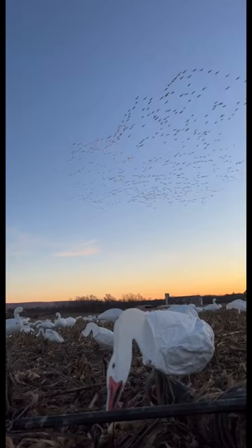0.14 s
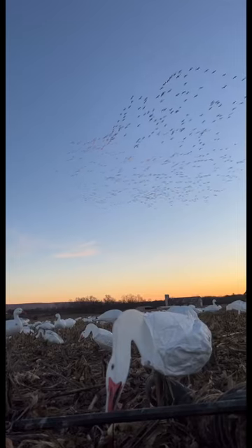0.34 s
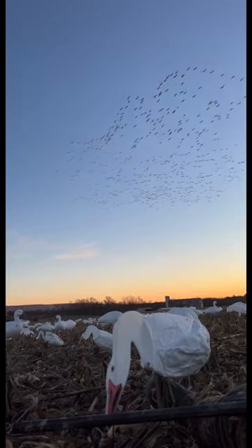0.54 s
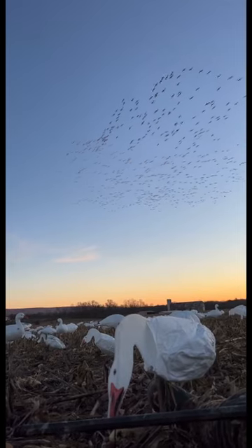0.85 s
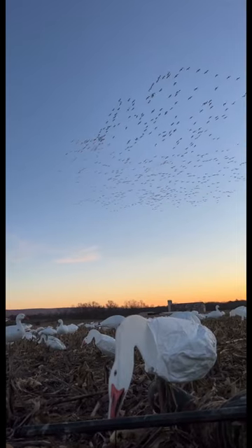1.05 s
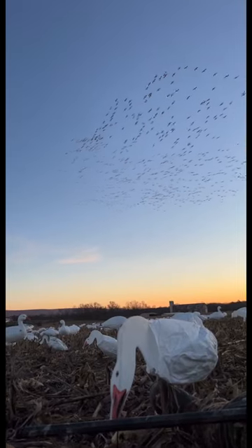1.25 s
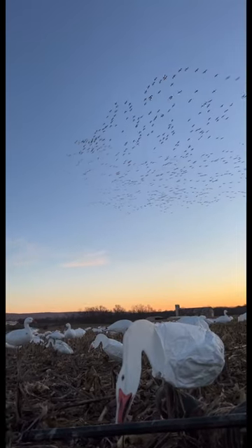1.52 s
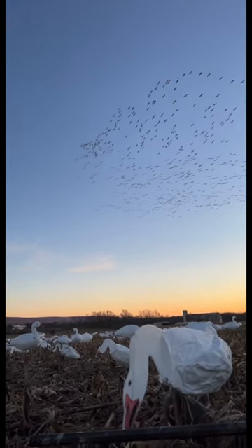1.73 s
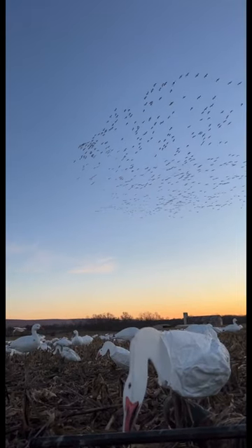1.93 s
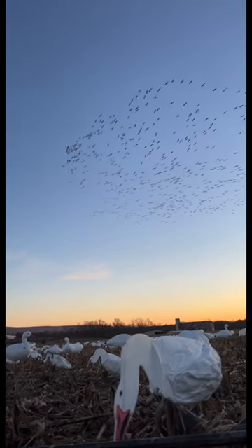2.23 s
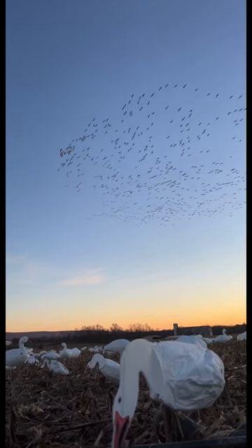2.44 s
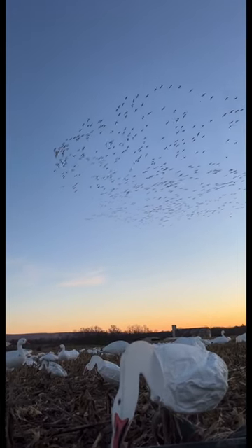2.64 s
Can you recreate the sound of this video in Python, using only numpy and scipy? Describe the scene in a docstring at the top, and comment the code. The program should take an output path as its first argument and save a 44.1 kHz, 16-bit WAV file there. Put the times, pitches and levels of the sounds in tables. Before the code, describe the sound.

A large flock of geese honking and yelping overhead, with low wind rumble.

```python
"""An open field, with a large flock of geese flying over, all calling at once.
Each call is a source and a filter: pulses from the syrinx, shaped by the resonances of the throat.
Near birds give short low grunts, hoarse squawks, nasal honks and shrill arched yelps, faintly
scattered by the ground and far trees; the distant birds merge into a clamour.
Gusts of wind rumble on the microphone."""
import sys
import numpy as np
from scipy import signal
from scipy.fft import rfft, irfft
from scipy.io import wavfile
from scipy.ndimage import uniform_filter1d, map_coordinates

SR = 44100
rng = np.random.default_rng(int(sys.argv[2]) if len(sys.argv) > 2 else 0)


def waveform_to_disk(signal):
    """Save audio, clipped to [-1, 1], as 16-bit WAV at the path in sys.argv[1]."""
    frames = np.transpose(np.atleast_2d(signal))
    scaled = np.clip(frames, -1, 1) * 32767
    samples = np.round(scaled).astype(np.int16)
    wavfile.write(sys.argv[1], SR, samples)


N = 122598
TIME = np.arange(N) / SR
CUTOFF_HZ = 15700
BLOCK = 64  # samples between updates of a voice's spectrum

# Swell and ebb of the distant chorus: time_s, relative_low_db, relative_treble_db
CHORUS_LEVELS = [(0.05, -37, -44.5), (0.42, -37, -44), (0.51, -40.5, -44), (0.62, -35, -33.5),
                 (0.81, -36, -40.5), (0.9, -36.5, -40.5), (1.02, -37.5, -49.5), (1.24, -34.5, -41),
                 (1.47, -37.5, -42.5), (1.68, -35.5, -45), (1.77, -41.5, -51), (1.9, -31.5, -35.5),
                 (2.05, -44.5, -49.5), (2.2, -35, -52.5), (2.42, -38.5, -44), (2.76, -35, -40.5)]
# Throat response of a distant bird, dulled by the air: frequency_hz, gain_db
DISTANT_THROAT = [(400, -61), (600, 1), (780, 8), (1200, 6), (1700, -4.5), (2400, -5), (3000, -7.5),
                  (3900, 1.5), (5500, -5), (7500, 2), (9000, -6.5), (11500, -30), (13500, -19),
                  (16000, -27)]


def from_db(db):
    """Amplitude ratio of a level in decibels."""
    return 10 ** (np.asarray(db) / 20)


def rms_one(x):
    """Normalisation to unit mean power."""
    return x / np.sqrt(np.mean(x ** 2) + 1e-20)


def at_hz(spectrum, hz):
    """Interpolation of a spectrum on a log-frequency axis."""
    knots_hz, knots_db = np.transpose(spectrum)
    return np.interp(np.log(hz + 1e-6), np.log(knots_hz), knots_db)


def drift(rate_hz, size):
    """Random modulation, interpolated between values of unit spread."""
    knots = rng.standard_normal(4096)
    return np.interp(np.arange(size) * rate_hz / SR, np.arange(len(knots)), knots)


def noise(spectrum):
    """Spectral shaping of white noise, at unit power."""
    gain = from_db(at_hz(spectrum, np.fft.rfftfreq(N, 1 / SR)))
    return rms_one(irfft(rfft(rng.standard_normal(N)) * gain, N))


def filtered(x, order, hz, kind):
    """Maximally flat low-, high- or band-pass filtering."""
    return signal.sosfilt(signal.butter(order, hz, kind, fs=SR, output="sos"), x)


def evened(x, window_s):
    """Division by the sliding rms holds a sound near unit power."""
    power = np.maximum(uniform_filter1d(x ** 2, int(window_s * SR)), 0)
    return x / np.sqrt(power + 1e-3 * np.mean(x ** 2))


def add(out, start_s, sound):
    """Superposition of a sound at its starting time."""
    i = int(start_s * SR)
    a, b = max(i, 0), min(i + len(sound), N)
    if b > a:
        out[a:b] += sound[a - i:b - i]


def arch(rise_s, fall_s, start_hz, crest_hz, end_hz, edge, break_share=0):
    """Pitch and amplitude contours of a call; register breaks make a share of the glide abrupt."""
    rise = np.linspace(-1, 0, max(int(rise_s * SR), BLOCK))
    fall = np.linspace(0, 1, max(int(fall_s * SR), BLOCK))
    position = np.r_[rise, fall]  # 0 at the crest
    rising = position < 0
    glide = abs(position) ** np.where(rising, 1.7, 1.35)
    break_at = np.where(rising, .55, .245)
    step = (1 + np.tanh((abs(position) - break_at) / .074)) / 2
    span_hz = crest_hz - np.where(rising, start_hz, end_hz)
    pitch = crest_hz - span_hz * ((1 - break_share) * glide + break_share * step)
    return pitch, np.cos(position * np.pi / 2).clip(0) ** edge


def voice(pitch, throat_db, top_hz, jitter, rasp, subharmonic_db):
    """Source and filter: unsteady syrinx pulses in a throat; strong-weak pulsing adds subharmonics."""
    colour_spread_db, colour_step_hz = 1.2, 650
    flutter_spread_db, flutter_per_s = 3, 55
    n = len(pitch)
    phase = 2 * np.pi * np.cumsum(pitch * (1 + jitter * (drift(350, n) + drift(70, n)))) / SR
    harmonic = np.arange(2, 2 * top_hz / pitch.max())[:, None] / 2  # 1, 1.5, 2, ...
    hz = harmonic * pitch[::BLOCK]
    # Each bird has its own colour and each partial flutters, both less so low in the spectrum.
    colour, flutter = rng.standard_normal(64), rng.standard_normal((512, 32))
    colour_db = colour_spread_db * np.interp(hz / colour_step_hz, np.arange(len(colour)), colour)
    partial_and_time = np.broadcast_arrays(2 * harmonic, TIME[:n:BLOCK] * flutter_per_s)
    flutter_db = flutter_spread_db * map_coordinates(flutter, partial_and_time, order=1, mode="nearest")
    variation_db = np.minimum(hz / 2500, 1) * (colour_db + flutter_db)
    gains = from_db(throat_db(hz) + variation_db + subharmonic_db * (harmonic % 1 > 0))
    angles = harmonic * phase + rng.uniform(0, 2 * np.pi, size=(512, 1))[:len(harmonic)]
    partials = np.repeat(gains, BLOCK, axis=1)[:, :n] * np.sin(angles)
    return np.sqrt(2) * partials.sum(0) * (1 + rasp * drift(900, n))


def far_flock():
    """Incoherent sources: distant honks and yelps at random times add up to a swelling, ebbing chorus."""
    calls_per_s, honk_share, split_hz = 44, .43, 2520
    chorus = np.zeros(N)
    for i in range(int(calls_per_s * N / SR) + 2):
        when, length, height, strength, bend, kind = rng.random(size=6)
        hz = 250 + 200 * height if kind < honk_share else 660 + 340 * height
        half_s = .03 + .035 * length
        start_hz, end_hz = hz * (.95 - .12 * bend), hz * (.95 - .1367 * bend)
        pitch, swell = arch(half_s, half_s, start_hz, hz, end_hz, edge=.57)
        call = voice(pitch, lambda f: at_hz(DISTANT_THROAT, f), CUTOFF_HZ,
                     jitter=.006, rasp=.2, subharmonic_db=-18)
        add(chorus, (i - 2 * when) / calls_per_s - half_s, from_db(16.5 * strength) * swell * rms_one(call))
    low = evened(filtered(chorus, 4, split_hz, "low"), window_s=.083)
    treble = evened(filtered(chorus, 4, split_hz, "high"), window_s=.077)
    low_db, treble_db = in_time_levels()
    return from_db(low_db - 3.5) * low + from_db(treble_db - 12.5) * treble


def in_time_levels():
    """Envelopes in dB of the chorus's low and treble bands, by linear interpolation."""
    time_s, low_db, treble_db = np.transpose(CHORUS_LEVELS)
    return np.interp(TIME, time_s, low_db), np.interp(TIME, time_s, treble_db)


def farthest_birds():
    """Very many overlapping voices blur into noise with the spectrum of their throats."""
    low_db, treble_db = in_time_levels()
    return from_db((low_db + treble_db) / 2 - 13) * noise(DISTANT_THROAT)


def wind():
    """Turbulence at the microphone: a steady rumble, and short buffets each in a band of its own."""
    # Spectrum of the steady breeze: frequency_hz, relative_density_db
    breeze = [(20, -24), (45, 8.5), (80, 3), (200, -11.5), (500, -29), (900, -50), (4000, -61.5)]
    # Buffets of wind: middle_s, half_length_s, centre_hz, relative_level_db
    buffets = [(0.316, 0.057, 118, -36.5), (0.389, 0.097, 58.4, -35), (0.576, 0.14, 52.6, -35),
               (0.842, 0.083, 104, -33), (1.469, 0.062, 59, -30), (1.523, 0.058, 65, -32.5),
               (1.634, 0.12, 58, -35), (1.866, .05, 73, -31.5), (1.938, 0.069, 68, -26),
               (2.051, 0.061, 57, -27.5), (2.167, 0.058, 85, -33), (2.237, 0.037, 78, -29),
               (2.631, 0.077, 70, -31.5), (2.751, 0.13, 61, -34)]
    out = from_db(-42.5) * noise(breeze)
    for middle_s, half_s, hz, level_db in buffets:
        rumble = filtered(rng.standard_normal(SR), 2, [hz / 1.3, hz * 1.243], "band")
        swell = np.hanning(int(2 * half_s * SR))
        puff = rumble[-len(swell):] * swell
        add(out, middle_s - half_s, from_db(level_db - 5) * rms_one(puff))
    return out


def buzzing_calls(calls, throat, sag, edge, gain_db, **roughness):
    """Slow pulses excite throat formants; the pitch lies lower by the fraction sag at both ends."""
    out = np.zeros(N)
    for middle_s, length_s, crest_hz, level_db, tilt_db_per_octave in calls:
        half_s, end_hz = length_s / 2, crest_hz * (1 - sag)
        pitch, swell = arch(half_s, half_s, end_hz, crest_hz, end_hz, edge)

        def throat_db(hz):
            return at_hz(throat, hz) + tilt_db_per_octave * np.log2(np.minimum(hz, 2500) / 1000)
        call = rms_one(voice(pitch, throat_db, top_hz=throat[-1][0], **roughness))
        add(out, middle_s - half_s, from_db(level_db + gain_db) * swell * call)
    return out


def grunts():
    """Narrow formants pick a few of the closely spaced harmonics of a short, low call."""
    # Near grunts: middle_s, length_s, pitch_hz, relative_level_db, tilt_db_per_octave
    calls = [(.08, 0.067, 124.5, -43.5, -11), (.945, 0.084, 141.3, -37, 14),
             (1.065, 0.061, 137.4, -38.5, -6.5), (1.215, 0.053, 142.1, -35, 6),
             (1.33, 0.056, 140.3, -37, -8), (1.445, 0.08, 142.6, -36.5, -12),
             (1.575, 0.063, 144.5, -35, -13), (1.635, 0.075, 138.4, -33.5, 12),
             (1.745, .07, 143.8, -30.5, 5.5), (1.88, 0.073, 137.6, -37, 3), (1.98, 0.1, 140.7, -38, -8),
             (2.11, 0.072, 139.4, -38.5, -9), (2.265, 0.058, 141.4, -42.5, -2)]
    # Throat response in a grunt: frequency_hz, gain_db
    throat = [(420, -45), (580, -20), (700, 4), (850, -28.5), (1000, 5.5), (1130, -4), (1260, -1),
              (1420, -7), (1800, -49), (3000, -44)]
    return buzzing_calls(calls, throat, sag=.055, edge=1.2, gain_db=-.5,
                         jitter=.0097, rasp=.18, subharmonic_db=-8)


def squawks():
    """Period doubling and deep random amplitude modulation make these bright outbursts hoarse."""
    # Near squawks: middle_s, length_s, level_db
    outbursts = [(.1, .07, -47), (.422, .04, -43), (1.61, .13, -42), (1.89, .09, -45)]
    # Throat response in a squawk: frequency_hz, gain_db
    throat = [(1000, -16), (4000, 0.5), (8500, 6), (11500, -19), (13500, -13), (16000, -27)]
    pitch_hz = 276.3
    calls = [(middle_s, length_s, pitch_hz, level_db, 0) for middle_s, length_s, level_db in outbursts]
    return buzzing_calls(calls, throat, sag=.05, edge=.7, gain_db=0,
                         jitter=.006, rasp=.5, subharmonic_db=-6)


def honks():
    """Formants near 750 Hz and 2 kHz give a nearly regular pulse train its nasal timbre."""
    # Near honks: middle_s, length_s, pitch_hz, relative_level_db, tilt_db_per_octave
    calls = [(.21, 0.13, 226.5, -43, -1), (.4, 0.14, 240.4, -45.5, -1), (.61, 0.091, 202.8, -40, -10.5),
             (.7, .13, 229.5, -40, -4.5), (.985, 0.091, 202.3, -40.5, -4.5), (1.6, 0.13, 211.6, -38.5, -5),
             (1.91, 0.099, 239, -43, -1), (2.18, 0.15, 241.4, -42, 0.5), (2.35, 0.22, 197.9, -39, 1.5),
             (2.7, 0.095, 225.7, -37.5, -3)]
    # Throat response in a honk: frequency_hz, gain_db
    throat = [(450, -59), (750, 1.5), (1250, -9), (1600, -2), (1980, 4.5), (2400, -9.5), (2900, -18.5),
              (4000, -12), (6000, -24), (11000, -31)]
    return buzzing_calls(calls, throat, sag=.11, edge=.51, gain_db=-1.5,
                         jitter=.0056, rasp=.035, subharmonic_db=-13)


def yelps():
    """Resonance: each high cry pierces at two peaks of its own, and is brightest at its crest."""
    # Near yelps: crest_s, rise_s, fall_s, start_hz, crest_hz, end_hz, gain_db, treble_db,
    # lower_resonance_hz, upper_resonance_hz
    calls = [(.171, 0.025, 0.065, 845, 870, 767, -56.5, -2.5, 3900, 8000),
             (.308, .085, .085, 780, 910, 775, -55.5, -3, 2500, 7200),
             (.38, 0.048, 0.017, 790, 793, 774, -57, -3, 2370, 6300),
             (.529, 0.019, 0.027, 598, 613, 580, -65, -7, 3650, 7250),
             (.718, .07, .07, 850, 925, 840, -53, -9, 2850, 5350),
             (.89, .048, .025, 400, 409, 407, -53.5, -16, 2480, 5330),
             (.988, 0.039, 0.058, 798, 813, 782, -62.5, -2.5, 3280, 5950),
             (1.115, 0.048, 0.039, 780, 822, 788, -59, -45, 2370, 4700),
             (1.128, .015, 0.078, 755, 791, 715, -60, -1, 4250, 7800),
             (1.406, .06, .05, 812, 843, 745, -53.5, -4, 2480, 3900),
             (1.535, 0.045, 0.033, 740, 798, 764, -54, -2, 2150, 7150),
             (1.596, .08, .08, 785, 862, 780, -48.5, -4.5, 3700, 7300),
             (1.652, .03, .07, 800, 795, 745, -53, -5, 4000, 9300),
             (1.945, .095, 0.035, 808, 815, 804, -60, -3, 3400, 5700),
             (1.977, 0.059, 0.038, 395, 422.4, 391.6, -61.5, -8, 3660, 4200),
             (2.121, .025, 0.041, 760, 785, 690, -60.5, -7, 4460, 7700),
             (2.303, 0.041, 0.023, 855, 883, 900, -55.5, -2.5, 3550, 6600),
             (2.34, 0.052, 0.057, 785, 794.5, 758, -59, -6.5, 3670, 5700),
             (2.5, .06, 0.13, 772, 837, 752, -56, -5.5, 2600, 7700),
             (2.58, .065, .06, 868, 930, 870, -52.5, -11, 2790, 7700),
             (2.668, .055, .03, 785, 816, 785, -52, -7, 2430, 3700),
             (2.712, 0.044, 0.1, 875, 882, 833, -65, -0.5, 3600, 6300)]
    # Throat response in a yelp: frequency_hz, gain_db
    throat = [(400, -24), (600, -2), (820, 3), (1250, -6), (1650, -1), (2450, 0), (3000, -4), (3800, -3),
              (5500, -4), (7500, 0), (8800, -1), (10000, -9), (11500, -27), (13500, -18), (16000, -36)]
    resonance_db, sharpness, treble_ramp_hz = 10, 9, [4200, 7050]
    out = np.zeros(N)
    for crest_s, rise_s, fall_s, start_hz, crest_hz, end_hz, gain_db, treble_db, *peaks_hz in calls:
        pitch, swell = arch(rise_s, fall_s, start_hz, crest_hz, end_hz, edge=.5, break_share=.295)
        effort_db = 10 * np.log10(swell[::BLOCK] + 1e-6)

        def throat_db(hz):
            shelf_db = (treble_db + effort_db) * np.interp(hz, treble_ramp_hz, [0, 1])
            peaks_db = sum(resonance_db / (1 + (sharpness * (hz / peak - 1)) ** 2) for peak in peaks_hz)
            return at_hz(throat, hz) + shelf_db + peaks_db
        cry = voice(pitch, throat_db, CUTOFF_HZ, jitter=.0035, rasp=.25, subharmonic_db=-17)
        add(out, crest_s - rise_s, from_db(gain_db) * swell * cry)
    return out


def field_scatter(direct):
    """Diffuse scattering from the ground and the far tree line adds a faint, dull tail."""
    reverberation_s = .27
    t = TIME[:SR // 2]
    tail = filtered(rng.standard_normal(len(t)), 1, 2500, "low") * from_db(-60 * t / reverberation_s)
    return from_db(-12) * signal.fftconvolve(direct, tail / np.linalg.norm(tail))[:N]


def scene():
    """Superposition in one channel of the near callers, their scatter, the distant birds and the wind."""
    near = grunts() + honks() + yelps() + squawks()
    return (near + field_scatter(near) + far_flock() + farthest_birds() + wind())[None]


def record(dry):
    """Gating and band limiting: the sound starts abruptly and a steep low-pass cuts the top."""
    start_s = .037
    low_pass = signal.cheby2(14, 70, CUTOFF_HZ + 900, fs=SR, output="sos")
    return signal.sosfilt(low_pass, dry * (TIME > start_s))


dry = scene()
out = record(dry)
waveform_to_disk(out)
```